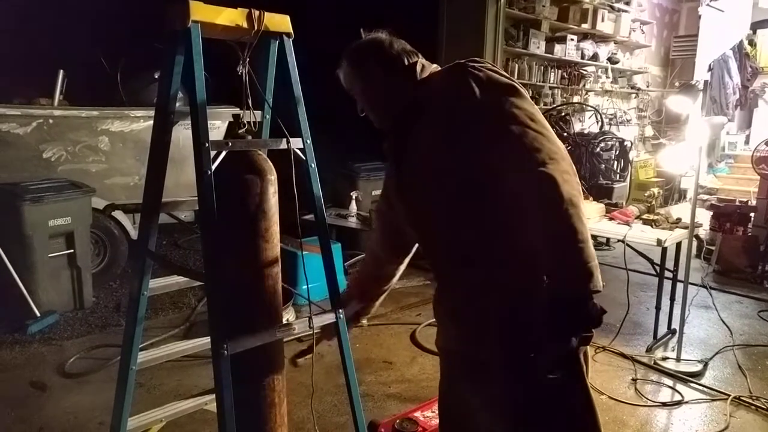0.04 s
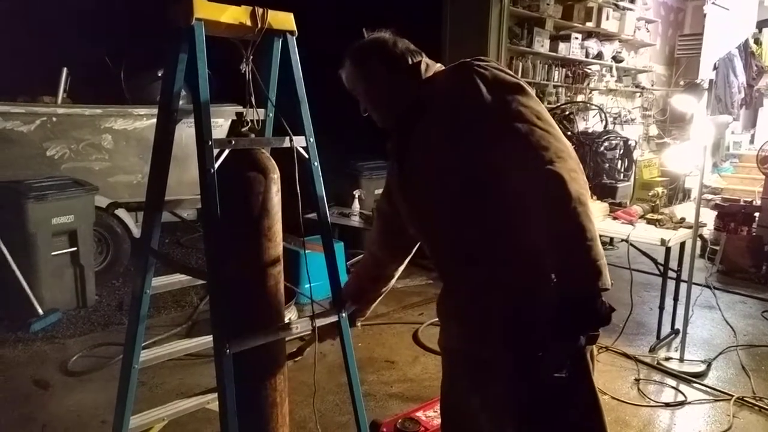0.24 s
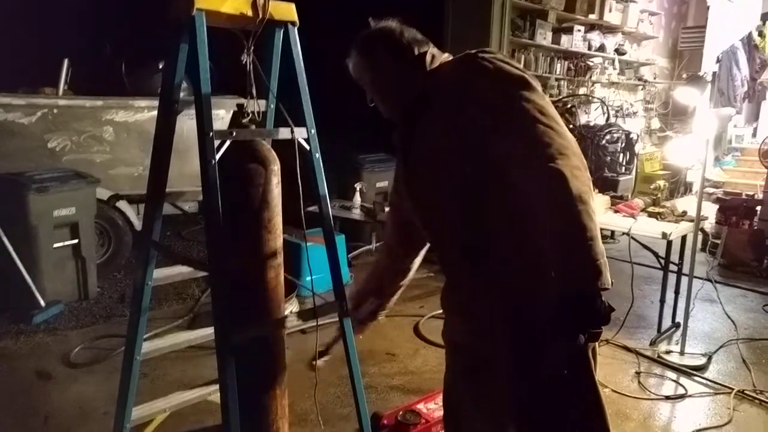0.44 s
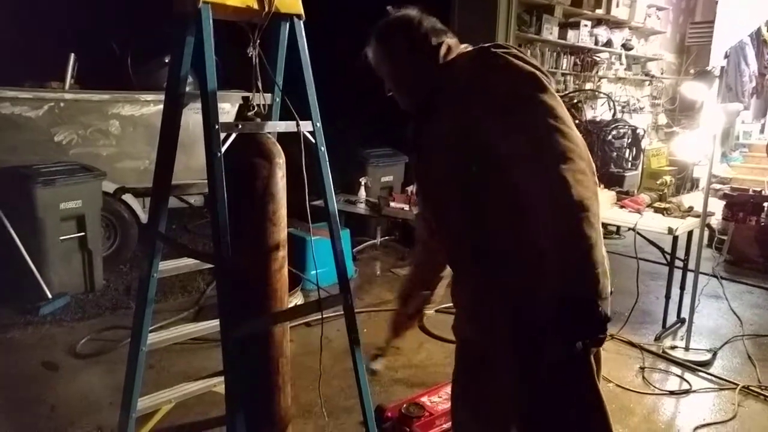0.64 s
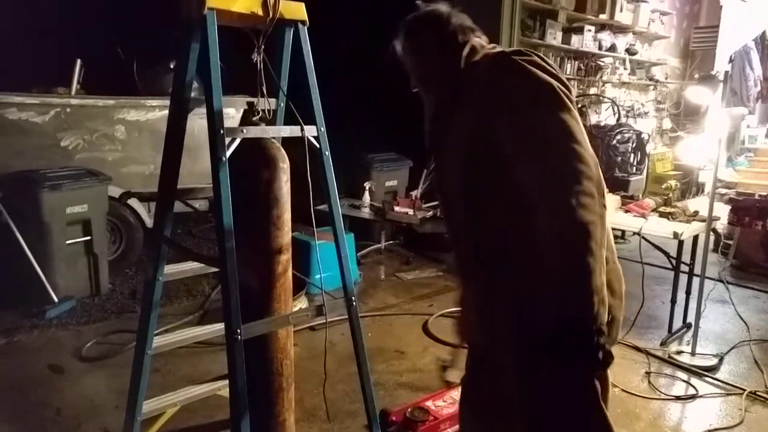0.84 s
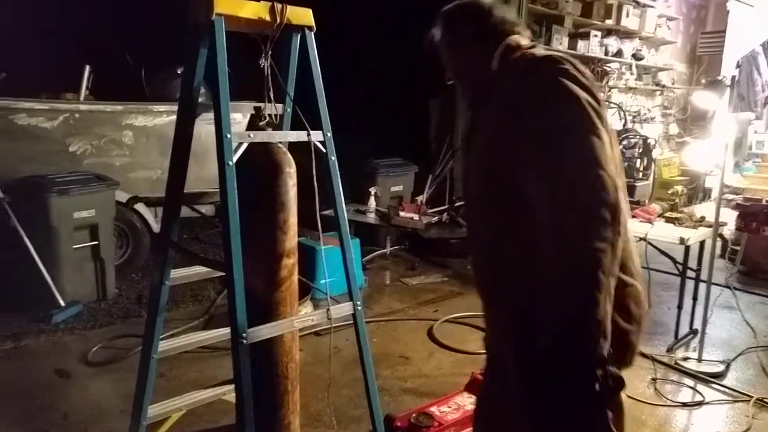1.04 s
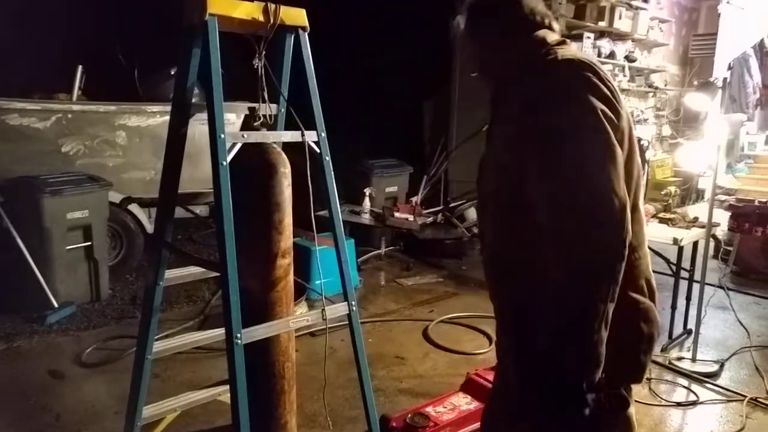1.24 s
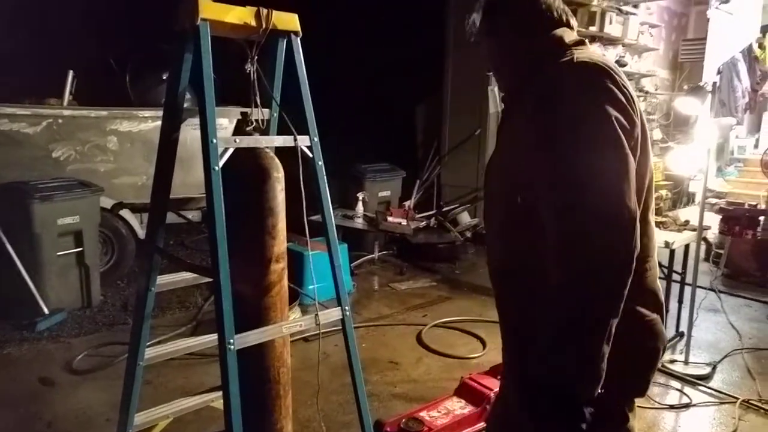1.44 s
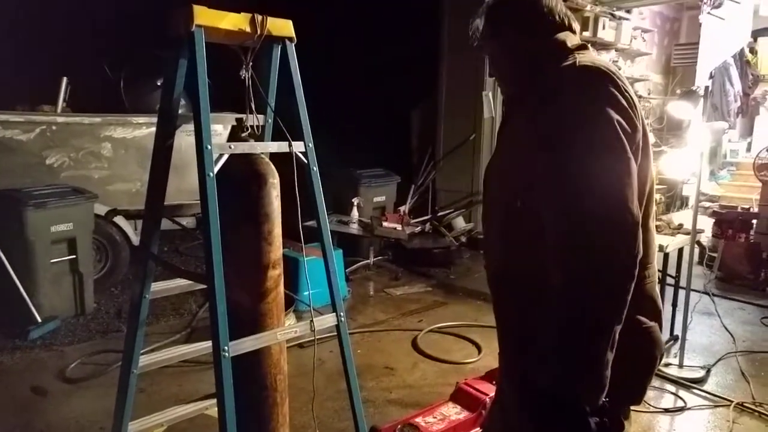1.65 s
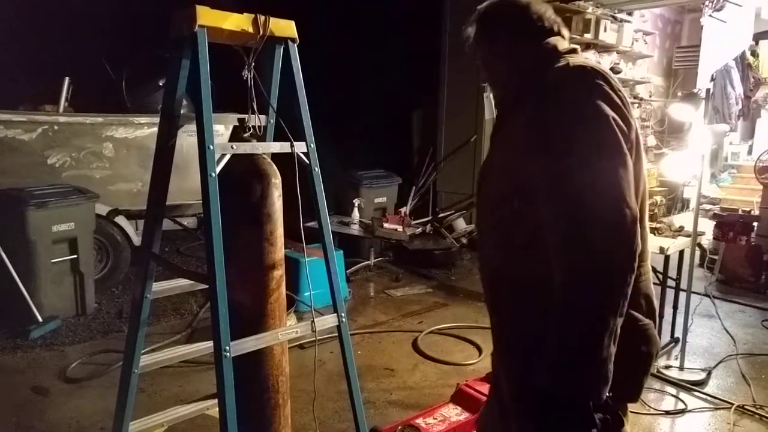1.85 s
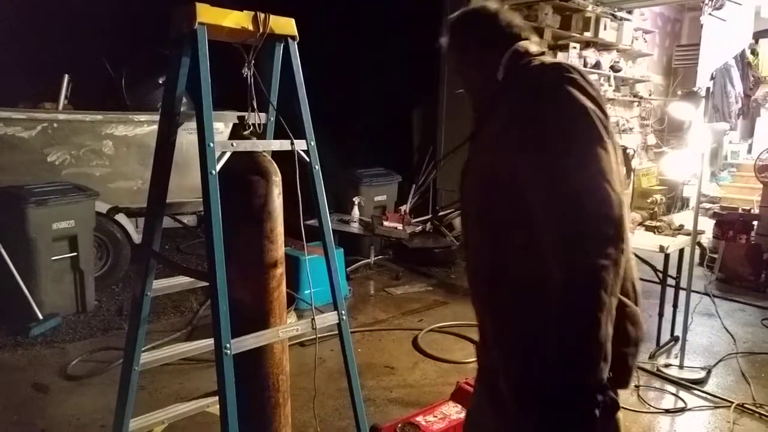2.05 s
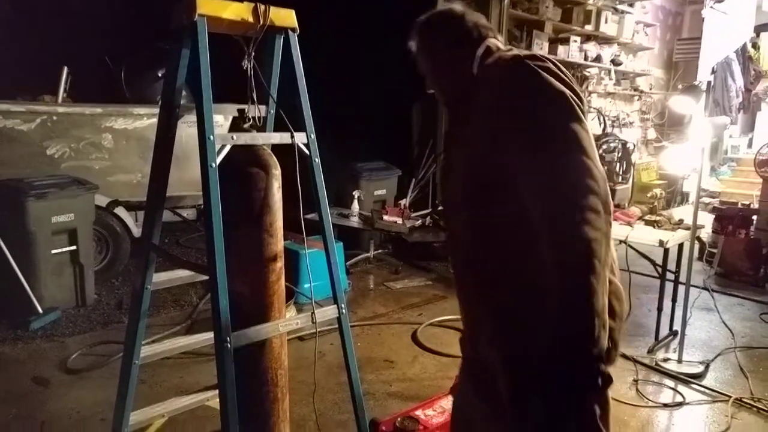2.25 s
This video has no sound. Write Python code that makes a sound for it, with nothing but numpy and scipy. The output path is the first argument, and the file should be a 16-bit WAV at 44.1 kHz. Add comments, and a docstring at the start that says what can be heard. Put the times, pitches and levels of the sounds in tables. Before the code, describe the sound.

One loud hammer clang on a hanging steel cylinder cuts off the low hum of an earlier blow. Heard close up in a workshop, it starts bright and distorted, then settles into pulsing, bell-like ringing.

```python
"""A steel gas cylinder, hung from a stepladder in a workshop, is struck hard with a hammer, close up. It still
hums from an earlier blow. Its bending and shell modes ring in beating pairs; the lowest outlast the rest. The
clang overloads the microphone and stays harsh and buzzing until it has died down to a clean bell tone. Behind
it are quiet room tone, a late swell of the background hiss and ticks of the hanging gear."""
import sys
import numpy as np
from scipy import signal
from scipy.fft import rfft, irfft
from scipy.io import wavfile

SR = 44100
rng = np.random.default_rng(int(sys.argv[2]) if len(sys.argv) > 2 else 0)


def transcribe(signal):
    """Save signal, clipped to [-1, 1], as a 16-bit WAV file at the path in sys.argv[1]."""
    frames = np.atleast_2d(signal).T
    limited = np.clip(frames, -1, 1)
    pcm = np.round(limited * 32767).astype(np.int16)
    wavfile.write(sys.argv[1], SR, pcm)


N = 105840
TIME = np.arange(N) / SR

# colour of the small noises, the late hiss swell and the hanging gear alike: (frequency [Hz], spectral level
# [dB])
SMALL_NOISE_COLOUR = [(300, -15), (1500, -2), (2400, 0), (4000, -9), (5800, -12), (6800, 2), (7800, -19),
                      (16000, -32)]


def from_db(db):
    """Decibels to gain."""
    return 10 ** (np.asarray(db) / 20)


def noise(colour):
    """Noise of rms 1, shaped by rows of (frequency [Hz], spectral level [dB])."""
    hz, db = np.transpose(colour)
    bin_hz = np.maximum(np.arange(N // 2 + 1) * SR / N, 1)
    gain = from_db(np.interp(np.log(bin_hz), np.log(hz), db))
    shaped = irfft(rfft(rng.standard_normal(N)) * gain, N)
    return shaped / shaped.std()


def decay(age, t60):
    """Exponential fall of 60 dB every t60 seconds."""
    return np.exp(-np.log(1000) * age / t60)


def tone(age, hz, phase):
    """A sine with its starting phase given in cycles."""
    return np.sin(2 * np.pi * (hz * age + phase))


def room_tone(level_db=-62.5):
    """The steady, quiet background of the workshop."""
    # colour of the room: (frequency [Hz], spectral level [dB])
    room_colour = [(25, -24), (60, -14), (140, -2), (220, -8), (380, 0), (600, -16), (1100, -12),
                   (1600, -18), (2600, -19), (4000, -24), (5800, -26), (6800, -16), (8000, -31),
                   (16000, -35)]
    return from_db(level_db) * noise(room_colour)


def hiss_swell():
    """The background hiss swells softly late in the ring."""
    # swell of the hiss: (time [s], level [dB])
    swell_levels = [(1.75, -90), (1.95, -73), (2.18, -68), (2.4, -71)]
    times, db = np.transpose(swell_levels)
    return from_db(np.interp(TIME, times, db)) * noise(SMALL_NOISE_COLOUR)


def gear_ticks(t60=.04):
    """The hanging gear shifts a little as the cylinder sways."""
    # faint ticks: (time [s], level [dB])
    ticks = [(.052, -62), (2.324, -60)]
    envelope = sum(from_db(db) * (TIME >= start) * decay(np.abs(TIME - start), t60) for start, db in ticks)
    return envelope * noise(SMALL_NOISE_COLOUR)


def hammer_crack(age, level_db=-9, room_t60=.55):
    """The noise of the impact scatters round the workshop and dies away."""
    # colour of the crack: (frequency [Hz], spectral level [dB])
    crack_colour = [(40, -22), (120, -21), (250, -3), (550, -8), (1200, 0), (2500, -1), (5000, -7),
                    (9000, -18), (16000, -30)]
    return from_db(level_db) * noise(crack_colour) * decay(age, room_t60)


def wall_modes(age, count=44):
    """A crowd of small, high modes of the wall; the higher, the weaker and shorter."""
    low_hz, high_hz = 2200, 12000
    level_db, db_per_octave = -13, -5
    low_t60, damping_exponent = .85, .45
    ring = 0
    for k, (scatter, phase) in enumerate(rng.random((count, 2))):
        ratio = (high_hz / low_hz) ** ((k + scatter) / count)
        gain = from_db(level_db + db_per_octave * np.log2(ratio))
        t60 = low_t60 / ratio ** damping_exponent
        ring += gain * decay(age, t60) * tone(age, low_hz * ratio, phase)
    return ring * np.sqrt(2 / count)


def shell_modes(age):
    """The higher shell modes give the steel its bright, short ring."""
    # pitch of each mode: (frequency [Hz])
    shell_hz = [2263, 2433, 2660, 2794, 3133, 3490, 3770, 4030, 4168, 4452, 4624, 4830]
    # ring of the same modes: (level [dB], t60 [s])
    shell_ring = [(-16, 1.0), (-7.5, .93), (-8.5, 1.0), (-19, 1.3), (-20, 1.08), (-18, .7), (-22, .98),
                  (-28, 1.1), (-17, .6), (-18, .6), (-26, .98), (-24, .8)]
    return sum(from_db(db) * decay(age, t60) * tone(age, hz, rng.random())
               for hz, (db, t60) in zip(shell_hz, shell_ring))


def beating_modes(age, waver_depth=.035):
    """The bell tone: the cylinder is not quite round, so each main mode splits into a beating pair."""
    # tuning of each pair: (frequency [Hz], twin's offset [Hz], time after the blow when in step [s])
    pair_tuning = [(384.6, 4.87, .113), (461.0, 3.19, .205), (764.2, 5.8, .109), (827.35, -.96, .57),
                   (1071.2, -2.3, .40), (1116.3, -4.0, .22), (1209.4, -2.4, .03), (1408.0, 18.8, .03),
                   (1748.4, -15.2, .06), (2012.1, 5.5, .01), (2096.0, -3.3, .25), (2165.5, 2.3, .0)]
    # ring of the same pairs: (level [dB], t60 [s], twin's relative level [dB])
    pair_ring = [(-19.7, 25, -4.8), (-32, 45, -1.3), (-8.5, 2.25, -15), (-.3, 3.0, -2.9),
                 (-4.4, 2.95, -5.8), (-11.8, 3.0, -30), (3.3, 2.55, -30), (-17.5, 1.62, -3),
                 (-.7, 1.01, -13), (-8, .95, -8), (-6.2, 1.25, -22), (-6.4, 1.08, -5)]
    # slight waver in each pair's loudness: (rate [Hz], spectral level [dB])
    waver_rates = [(1, -6), (6, 0), (15, -12), (60, -23), (170, -26), (300, -55), (600, -110)]
    ring = 0
    for (hz, split_hz, in_step_s), (db, t60, twin_db) in zip(pair_tuning, pair_ring):
        phase = rng.random()
        mode = tone(age - in_step_s, hz, phase)
        twin = from_db(twin_db) * tone(age - in_step_s, hz + split_hz, phase)
        waver = 1 + waver_depth * noise(waver_rates)
        ring += from_db(db) * decay(age, t60) * (mode + twin) * waver
    return ring


def struck_cylinder(contact_s=.0007):
    """Each blow builds up over the hammer's contact and replaces the ringing before it."""
    # hammer blows, the first heard only as its lingering hum: (time [s], level [dB])
    blows = [(-2.65, -5.2), (0.2298, 0.0)]
    starts, db = np.transpose(blows)
    latest = np.searchsorted(starts, TIME, side="right") - 1
    age = TIME - starts[latest]
    strength = from_db(db[latest]) * np.minimum(age / contact_s, 1)
    return strength * (beating_modes(age) + shell_modes(age) + wall_modes(age) + hammer_crack(age))


def scene():
    """The cylinder rings close to one microphone, over the quiet of the workshop."""
    return (struck_cylinder() + room_tone() + hiss_swell() + gear_ticks())[None]


def slew_limit(wave, max_step):
    """An input that follows the wave by no more than max_step per sample."""
    followed, now = [], 0.
    for target in wave.tolist():
        now += min(max(target - now, -max_step), max_step)
        followed.append(now)
    return np.array(followed)


def record(dry):
    """The overloaded microphone flattens peaks and slows steep edges; deepest bass and top are cut."""
    clip_level, slew_per_ms = .675, 15
    low_cut_hz, high_cut_hz, gain_db = 5, 15900, .35
    clipped = np.clip(dry[0], -clip_level, clip_level)
    slewed = slew_limit(clipped, slew_per_ms * 1000 / SR)
    low_cut = signal.butter(1, low_cut_hz, "high", fs=SR, output="sos")
    high_cut = signal.firwin(255, high_cut_hz, fs=SR)
    amplified = from_db(gain_db) * signal.sosfilt(low_cut, slewed)
    return signal.fftconvolve(amplified, high_cut, "same")[None]


dry = scene()
out = record(dry)
transcribe(out)
```